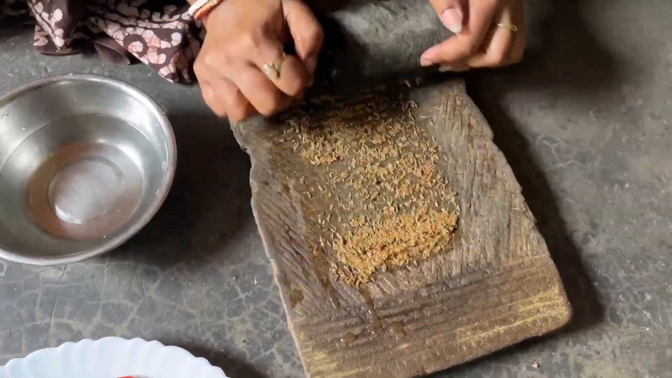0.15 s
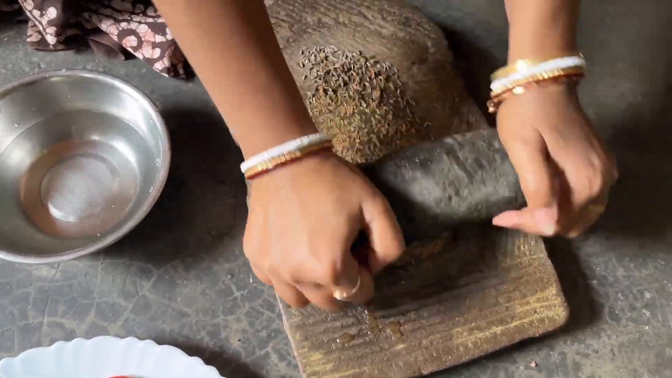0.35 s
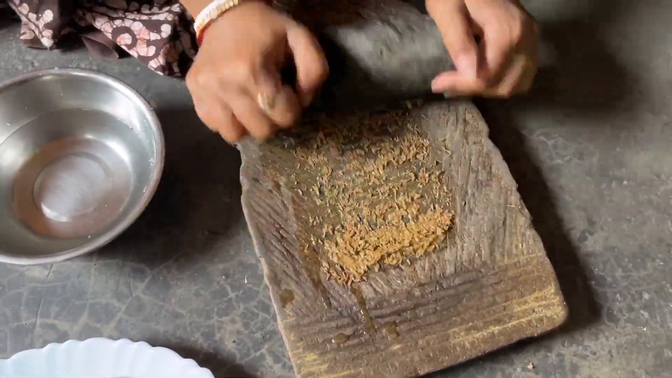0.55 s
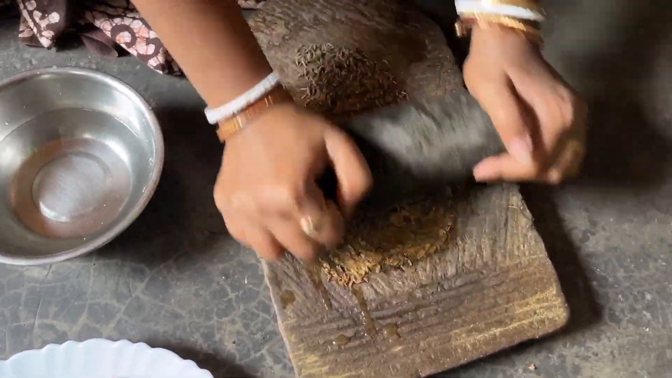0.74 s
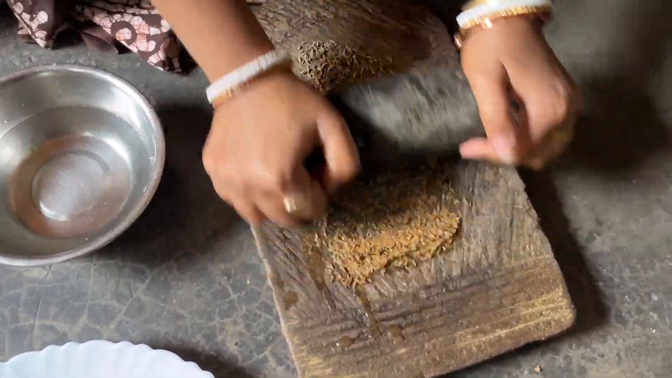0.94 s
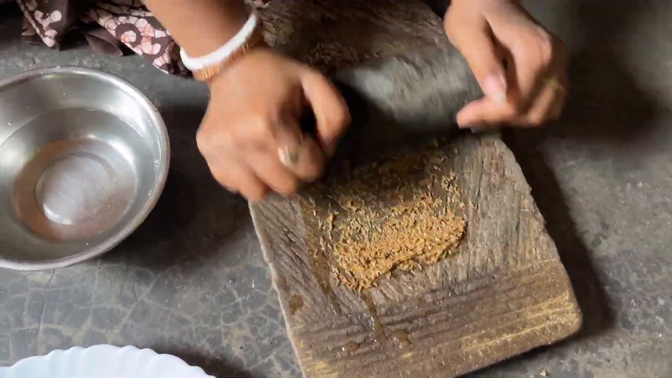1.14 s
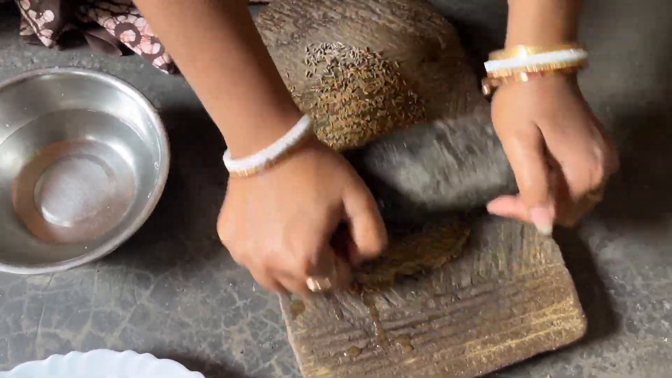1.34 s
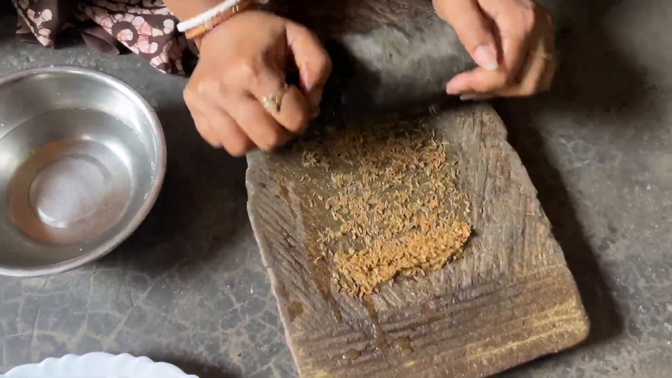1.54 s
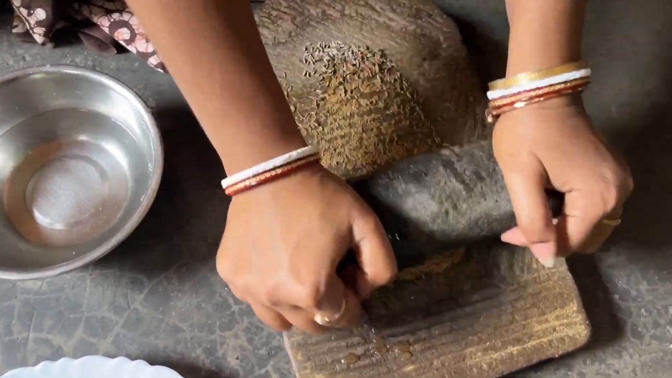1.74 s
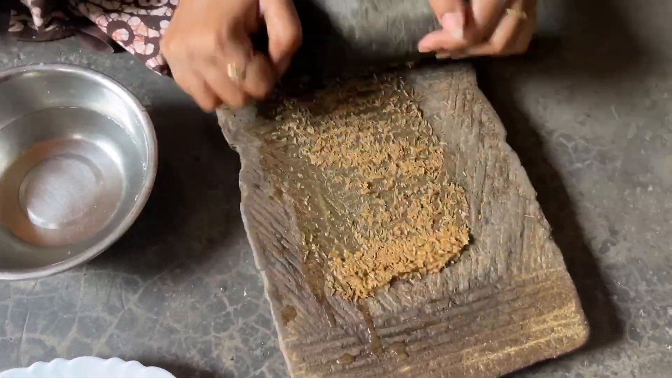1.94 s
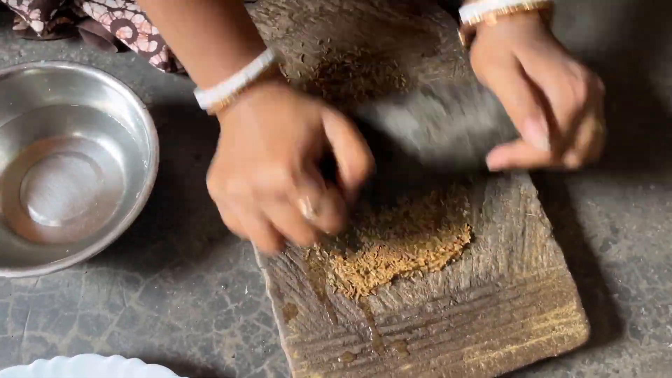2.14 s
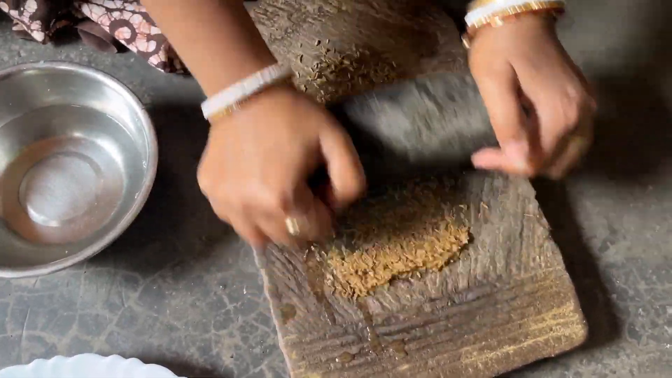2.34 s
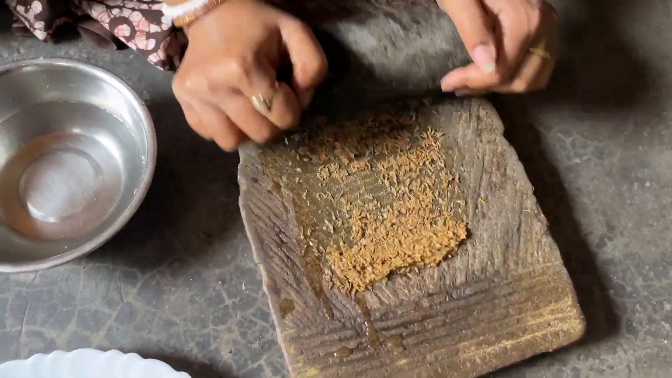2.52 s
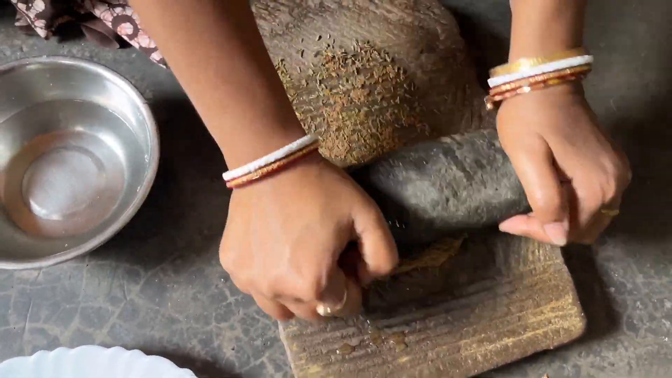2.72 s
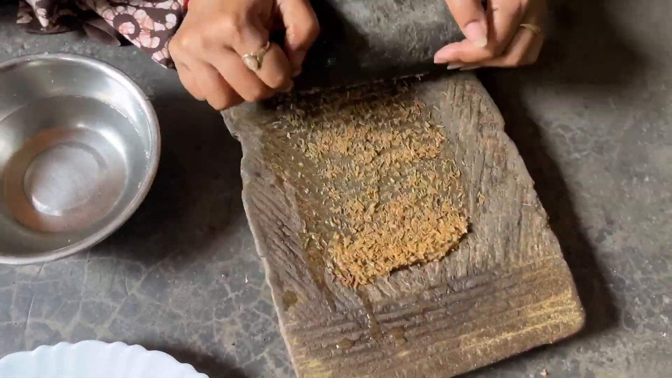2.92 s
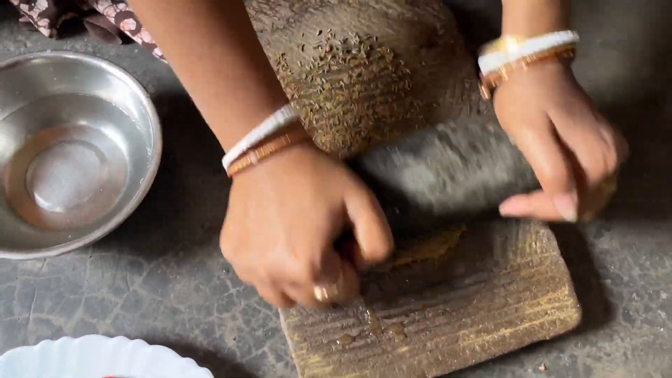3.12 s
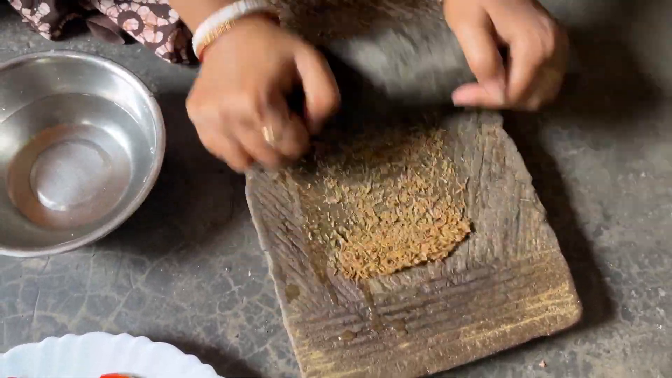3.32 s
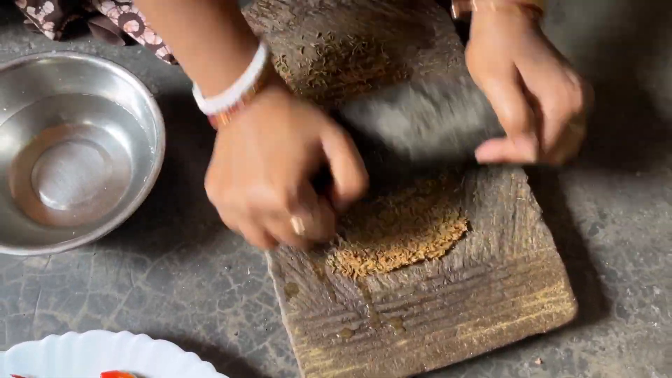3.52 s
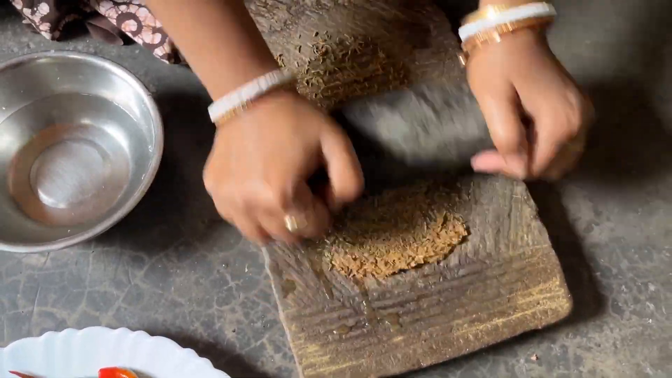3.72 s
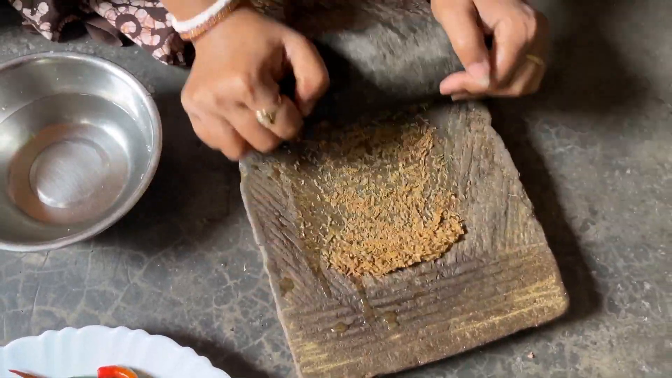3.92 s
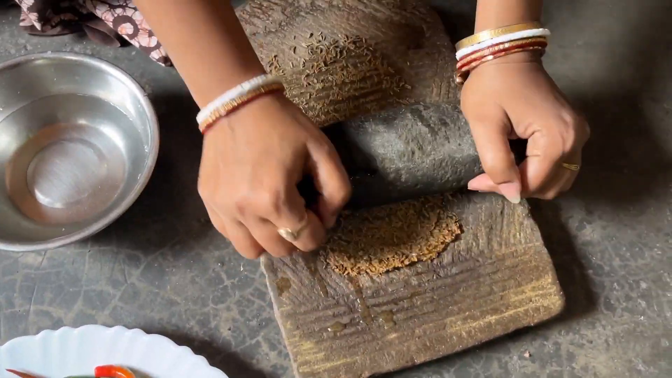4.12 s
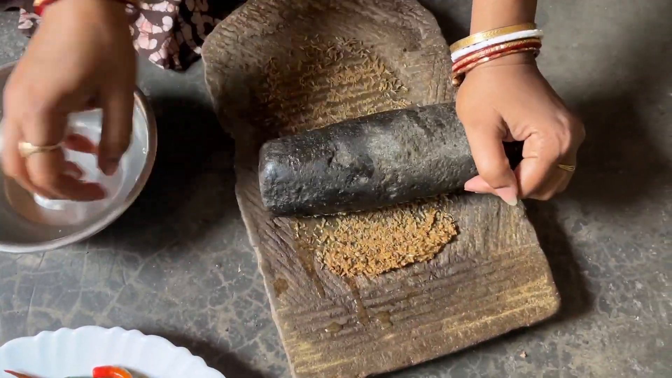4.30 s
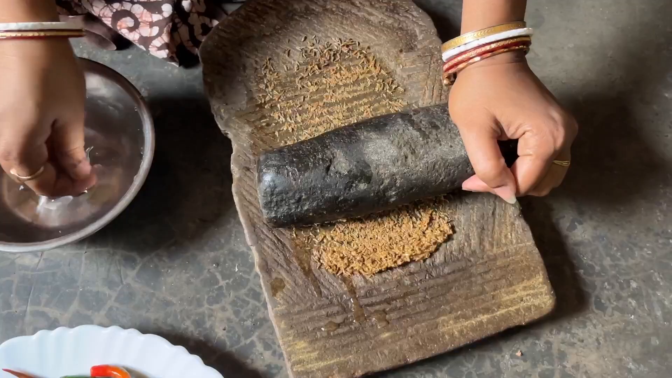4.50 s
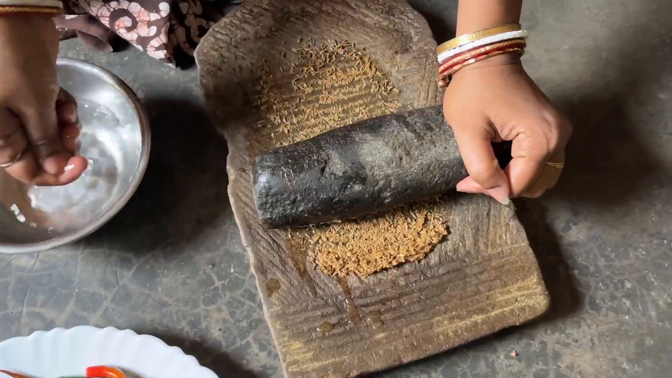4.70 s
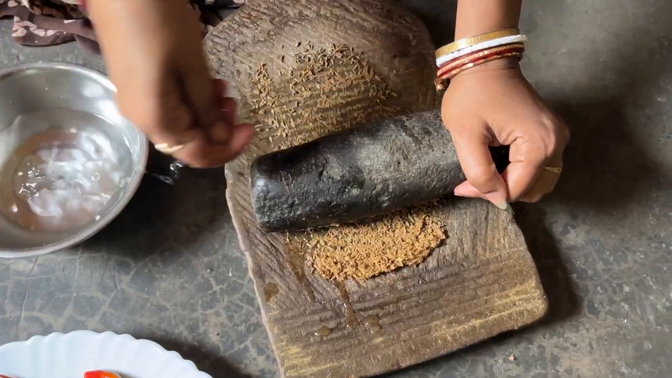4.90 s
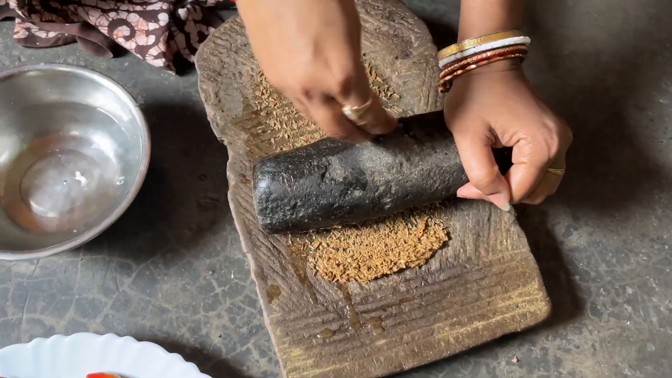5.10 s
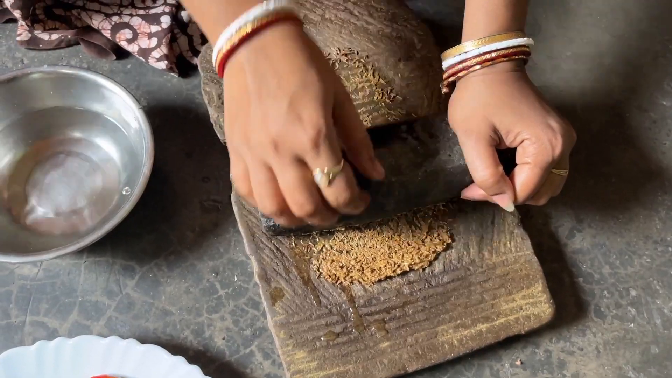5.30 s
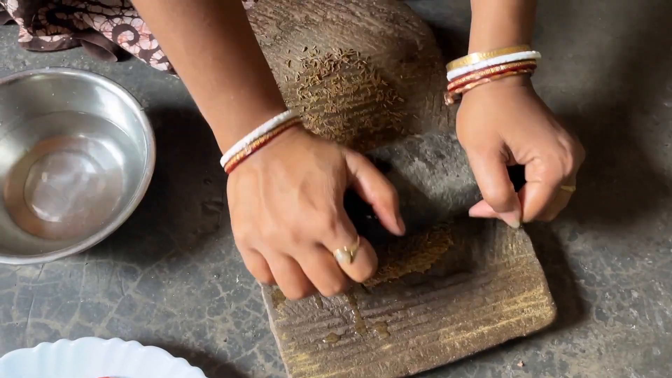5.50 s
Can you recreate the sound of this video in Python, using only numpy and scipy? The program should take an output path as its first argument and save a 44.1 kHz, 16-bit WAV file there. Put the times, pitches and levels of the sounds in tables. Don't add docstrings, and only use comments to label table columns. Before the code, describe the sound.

Stone grinds on stone in brisk strokes, roughly two full cycles each second: clattering ringing jolts, coarse scraping, crunching seeds and a heavy floor rumble. Thin metal bangles tick at stroke turns. The grinding halts just after four seconds, leaving soft sizzling from a pan further off, a low kitchen hum and quiet watery plips. A faint stone touch returns at the end. Close stereo pickup, short dull room tail.

```python
import sys
import numpy as np
from scipy import signal
from scipy.fft import rfft, irfft
from scipy.io import wavfile

SR = 44100
rng = np.random.default_rng(int(sys.argv[2]) if len(sys.argv) > 2 else 0)


def digitize_waveform(pressure):
    field = np.atleast_2d(pressure).T
    bounded = np.clip(field, -1, 1)
    quanta = np.round(bounded * 32767).astype(np.int16)
    wavfile.write(sys.argv[1], SR, quanta)


def gain_from_db(level_db):
    decades = np.asarray(level_db, float) / 20
    return 10 ** decades


N = 244755


def stroke():
    # turn t/s, weight level/dB, lift at the turn/dB, rasp above weight/dB
    passes = [(-.1, -37.5, -5, 7), (.15, -31.5, -14.5, -5), (.38, -34, -7, 0.5), (.55, -32, -2.5, -4),
              (.83, -33, -10, -4), (1.09, -34.5, -2.5, -1.5), (1.3, -32, -7.5, -4), (1.56, -32, -2.5, -4),
              (1.75, -34.5, -7.5, 1.5), (2.05, -32.5, -7, -0.5), (2.241, -32, -13.5, -2.5),
              (2.5, -33.5, 2, -7.5), (2.73, -30, -14, -8), (2.98, -34, -3, -2), (3.2, -32, -12.5, -5.5),
              (3.44, -32.5, -2, -5.5), (3.65, -32, -12, -4.5), (3.91, -39.5, 3.5, -2)]
    # t/s, level/dB, length/s
    skids = [
        (0.0, -32, 0.18),
        (0.64, -47, 0.13),
        (1.63, -44, 0.085),
        (1.915, -33, 0.024),
        (2.085, -35.5, 0.035),
        (2.2, -35, 0.022),
        (4.107, -52, 0.079),
    ]
    rise_s, fall_s, sag_db = 0.092, 0.05, -3
    set_down_s, die_s, restart_s, restart_db = 4.11, 0.084, 5.44, -46
    mean_db, slab_follows, muller_follows = -31, 1.38, 0.54

    ends = [p[0] for p in passes[1:]] + [set_down_s]
    rows = []
    for (s, db, lift_db, rasp_db), end in zip(passes, ends):
        rows += [(s, db + lift_db, rasp_db), (s + rise_s, db, rasp_db)]
        rows += [(max(end - fall_s, s + rise_s), db + sag_db, rasp_db)]
    rows += [(set_down_s, -49, 1.5), (set_down_s + die_s, -64, 3), (set_down_s + 2 * die_s, -90, 0)]
    rows += [(restart_s - .04, -90, 0), (restart_s, restart_db - 10, -4), (N / SR, restart_db, -4)]
    weight_db, rasp_db = in_time(rows)
    above_mean_db = weight_db - mean_db
    slab_db = mean_db + slab_follows * above_mean_db + rasp_db
    muller = gain_from_db(-46 + muller_follows * above_mean_db) + swells(skids)
    return weight_db, slab_db, 20 * np.log10(muller)


def jolts():
    # t/s, slab level/dB, muller ring and edge ring above slab/dB
    knocks = [(0.088, -13.5, -5.5, -18), (0.402, -11.5, -7, -1), (0.467, -11, -6.5, -3.4),
              (0.507, -13, -7, -1), (0.858, -18, -14, -3), (0.9182, -12, -10, -4), (0.9546, -15.5, -11, -2),
              (1.1657, -16.5, -14, -3), (1.3108, -16, -12, -8), (1.3716, -12, -10, -5.5),
              (1.408, -15, -10, -7), (1.618, -16.5, -23, -4.5), (1.8046, -18, -17, -12),
              (1.8388, -21, -14.1, -14.4), (2.273, -12.5, -17, -0.5), (2.332, -8, -10, -4),
              (2.3703, -13, -10, -1), (2.7993, -13, -11, -6.5), (2.834, -12, -12, -2.5),
              (3.2732, -15, -16, -5.5), (3.3052, -18.5, -12, -4), (3.6822, -17, -12, -4),
              (3.738, -10.5, -12, -2), (3.7723, -13.5, -11, -1.5)]
    # t/s, slab level/dB, muller and edge ring above slab/dB
    glances = [(.0115, -32, 6, -10), (0.022, -38, 8, -8), (0.025, -23, 10, -6), (.245, -32, 6, -1),
               (.322, -27, -4, 12), (.426, -33, 2, -5), (.493, -34, 4, 3), (0.679, -24, -5, -12),
               (.712, -36, -3, 12), (0.808, -36, 3, -8), (0.925, -36, 6, -5), (2.066, -40, 9, -8),
               (2.09, -31, -6, -6), (2.009, -35, -5, 14), (3.201, -40, -2, 17), (3.21, -42, -4, 11),
               (3.054, -37, 1, 0), (3.256, -37, -2, 11)]
    # t/s, slab level/dB, muller ring and edge ring above slab/dB, slab f/Hz
    chatter = [(0.191, -31, -20.9, -11.5, 840), (0.5911, -6.5, -28, -11, 910), (0.6242, -5, -23, -14, 960),
               (1.0126, -19.5, -21, -17, 900), (1.4653, -14.5, -19, -20, 900), (1.4724, -17, -12, -20, 930),
               (1.4862, -10.5, -32.9, -27, 940), (1.5048, -16, -23, -25.7, 980),
               (1.5213, -20.5, -24, -21, 1000), (1.9509, -18, -5, -11, 900), (2, -24, -26.2, -16, 970),
               (2.036, -30, -18.8, -6, 970), (2.0468, -24, -24.8, -15.4, 1000),
               (2.0644, -17.5, -22, -15.0, 880), (2.4551, -5.5, -21, -7, 910),
               (2.4688, -10.5, -3, -20, 930), (2.4796, -8, -24, -8, 980), (2.5028, -12, -25, -10, 980),
               (2.8918, -14, -20, -19, 930), (2.913, -10.5, -29.0, -15, 950), (2.929, -16, -26.0, -12, 930),
               (2.9353, -26, -6, -14.7, 1000), (2.945, -19, -26.1, -15, 1000), (3.358, -11, -16, -14, 900),
               (3.38, -11.5, -28.2, -18, 970), (3.3977, -20, -21.1, -19, 1030),
               (3.4107, -24, -20.1, -19.6, 1000), (3.8511, -8.5, -32, -8, 1000),
               (3.8734, -14.5, -12, -19, 960)]
    # t/s, muller level/dB, edge ring above it/dB
    blows = [(.002, -13, -7), (0.0137, -28, -29), (0.0296, -10, -2), (0.0381, -9.5, 0), (0.3122, -15.5, 0),
             (1.852, -12, 2), (1.8988, -6.5, -0.5), (2.1708, -23, 1), (4.07, -18.5, -1),
             (1.8562, -14.5, -20), (1.8951, -27, 16), (1.666, -31.5, 14), (2.22, -24, -20)]
    # t/s, slab level/dB, slab f/Hz
    sings = [
        (2.0035, -24, 1000),
        (2.0105, -24, 1040),
        (2.017, -25, 1050),
        (2.0385, -26, 1000),
        (2.073, -24.5, 900),
        (1.5255, -30, 1040),
        (1.5325, -23, 1000),
    ]
    # t/s, slab level/dB
    rocks = [(.4193, -16.5), (.487, -18), (.801, -28), (1.1529, -22), (1.2517, -24), (1.605, -25.5),
             (1.693, -16), (1.9339, -21), (2.2868, -16), (2.354, -17), (2.7397, -22.5), (2.8158, -18.5),
             (3.1396, -17.5), (3.4903, -20), (3.5894, -19), (3.7579, -15.5), (5.461, -35)]
    # t/s, slab level/dB
    rattles = [(.5739, -9), (.6046, -10.5), (1.493, -26), (1.5112, -40), (2.022, -28), (2.4392, -9),
               (2.4868, -14.5), (2.897, -19.5), (2.9222, -26), (3.3673, -17), (3.3895, -21), (3.8394, -15),
               (3.8601, -15)]
    # t/s, slab level/dB
    drags = [(.26, -22.5), (.7061, -23.5), (1.1348, -20.5), (1.5839, -23), (1.666, -32), (2.1163, -20.5),
             (2.5571, -22.5), (2.5828, -20), (3.0224, -26), (3.0445, -23), (3.4728, -19), (3.5015, -21),
             (1.761, -28.5), (2.108, -26), (2.131, -33), (2.545, -41), (3.22, -30), (3.693, -27),
             (3.94, -31.5)]
    # t/s, slab level/dB
    settles = [
        (1.7058, -16.5),
        (2.2146, -22.5),
        (2.6891, -23),
        (3.1519, -20.5),
        (3.5999, -21.5),
    ]
    # t/s, slab level/dB
    leads = [
        (.56, -7),
        (1.9405, -8.5),
        (2.4266, -6.5),
        (3.8276, -7),
    ]
    # t/s, slab level/dB
    touches = [(.176, -29), (3.466, -26), (3.538, -34), (.205, -29), (.8665, -21), (3.066, -33),
               (3.288, -28), (.645, -24), (.9365, -26), (1.028, -25), (1.101, -34), (1.39, -26),
               (1.263, -25), (1.772, -30), (1.826, -29), (2.497, -22), (2.522, -32), (2.681, -27),
               (2.853, -25), (2.982, -29), (3.4025, -26), (3.444, -31), (2.591, -26)]
    # muller ring, edge ring and thud above slab/dB, slab f/Hz
    kinds = [(rocks, (-6.5, -16, -1, 811)), (rattles, (-3.5, -7, -6.5, 1008)), (drags, (-7, -4, 0, 962)),
             (settles, (-3, -24, -2, 750)), (leads, (-14, -5, -21, 940)), (touches, (-11, -9, -8.5, 898))]
    knock_thud_db, knock_hz = -6.5, 930
    chatter_thud_db, chatter_pitch = -16, 1.05
    blow_slab_db, blow_thud_db, blow_hz = -4.5, -6, 1000

    rows = [(*knock, knock_thud_db, knock_hz) for knock in knocks + glances]
    for table, kind in kinds:
        rows += [(s, db, *kind) for s, db in table]
    rows += [(*beat, chatter_thud_db, chatter_pitch * hz) for *beat, hz in chatter]
    for s, db, edge_db in blows:
        above_slab_db = (-blow_slab_db, edge_db - blow_slab_db, blow_thud_db - blow_slab_db)
        rows.append((s, db + blow_slab_db, *above_slab_db, blow_hz))
    rows += [(s, db, -20, -17, -25, hz) for s, db, hz in sings]
    return np.array(rows)


def bounces(rows):
    bounce_s, bounce_db, bright_db = .005, -17, 1
    late, loose, spot = rng.uniform(-1.16, 1, (len(rows), 3)).T
    again = rows + [bounce_s, bounce_db, bright_db, bright_db, 3.0, 0]
    again[:, 0] += 0.297 * bounce_s * late
    again[:, 1] += 2.5 * loose
    again[:, 5] *= 1 + 0.22 * spot
    return again


def ring(hz, t60, rise_s, left_db=0.):
    choke_s = 0.0024
    t = np.arange(min(int(t60 * SR), 2500)) / SR
    left = min(gain_from_db(left_db), 1)
    after = np.maximum(t - rise_s, 0)
    choke = left + (1 - left) * np.exp(-(after / choke_s) ** 2)
    swell = np.sin(np.pi / 2 * np.minimum(t / rise_s, 1)) ** 2
    decay = gain_from_db(-60 * after / t60)
    return swell * decay * choke * np.cos(2 * np.pi * hz * (t - rise_s))


def stones(slab_db, muller_db):
    # f/Hz, level/dB, time to fall 60 dB/s, left over right/dB
    tones = [
        (271.5, -9, 0.036, -3),
        (499, -1.5, 0.02, 3),
        (883.6, -1, 0.031, 4.5),
        (970, -9, 0.014, 10.5),
        (1392, -3.5, 0.056, -5),
        (1428, -11.5, 0.016, 20),
        (2235, -9, 0.0089, -1),
        (3320, -4.5, 0.032, 2),
        (1765, -3.5, 0.015, 6),
    ]
    excited_by = [3, 3, 0, 0, 1, 1, 4, 5, 2]
    facing = [1, 1, 1, 1, -1, -1, 1, 1, 1]
    left_ringing_db = [-11, 2.5, -2.5, -7, 11, 0]
    # t/s, level/dB, length/s
    slides = [
        (.19, -37, 0.092),
        (.65, -38, 0.11),
        (1.5, -34, 0.079),
        (2.03, -34, 0.069),
        (2.52, -40, 0.12),
        (2.92, -43, 0.21),
        (3.39, -31, 0.046),
    ]
    # t/s, level/dB, length/s
    rubs = [
        (3.96, -28, 0.046),
        (4.02, -31, 0.041),
    ]
    slab_hz, crest_s = 940, 0.002
    slow_lows = 0.41
    detune = .012

    rows = jolts()
    luck = rng.standard_normal((len(rows), 2, len(tones)))
    rows = np.vstack([rows, bounces(rows)])
    at = np.maximum(((rows[:, 0] - crest_s) * SR).astype(int), 0)
    part_db = rows[:, 1:2] + rows[:, 1:5] * [0, 1, 1, 1]
    hard_edge_db = 1.06 * part_db[:, 2] - 5
    hard_muller_db = 2 * part_db[:, 1] - 0.5
    strength_db = np.column_stack([part_db, hard_edge_db, hard_muller_db])
    chance, spot = np.vstack([luck, luck[::-1]]).transpose(1, 0, 2)
    shifts = rows[:, 5] / slab_hz

    scratch = rms_one(grains(800, spread_db=2.0))
    slide_db = 20 * np.log10(gain_from_db(slab_db) + swells(slides))
    rub_db = 20 * np.log10(gain_from_db(slab_db) + swells(rubs))
    out = np.zeros((2, N))
    for k, (hz, level_db, t60, lean_db) in enumerate(tones):
        part = excited_by[k]
        thud_db = rub_db if hz < 400 else slab_db
        rasp_db = [slide_db - 23.5, muller_db - 19.0, slab_db - 22.5, thud_db - 23.5, -99, -99][part]
        rasp = gain_from_db(rasp_db + 5.5) * scratch * rng.choice([-1, 1], N)
        damped = ring(hz, 0.39 * t60, rise_s=0.0024)
        rung = np.pad(signal.oaconvolve(rasp, damped)[:N], (0, 2500))
        follows = [1, .25, .1, 0, 0, 0][part]
        rise_s = crest_s * (slab_hz / hz) ** slow_lows
        pitches = hz * (1 + detune * spot[:, part]) * shifts ** follows
        hits_db = strength_db[:, part] + 1.4 * chance[:, k]
        for i, pitch, db in zip(at, pitches, hits_db):
            hit = ring(pitch, t60, rise_s=rise_s, left_db=left_ringing_db[part])
            rung[i:i + len(hit)] -= facing[k] * gain_from_db(db) * hit
        out += rung[:N] * gain_from_db(level_db + np.array([[lean_db / 2], [-lean_db / 2]]))
    return out


def rumble(rumble_db):
    # f/Hz, level per Hz/dB
    roll_tone = [(38, -34), (60, -1.5), (90, -1), (150, -3), (230, -6), (330, -11.5), (600, -19),
                 (1200, -29)]
    # f/Hz, width/Hz, level/dB
    floor = [
        (84, 39, 1),
        (135.4, 10.5, 5),
        (223.5, 29, 5),
    ]
    lumps = gain_from_db(rumble_db + 1.14 * drift(29.01) + 0.76 * drift(11.0))
    roll = colour(grains(3000, spread_db=4.0), roll_tone)
    lift_db = resonances(np.fft.rfftfreq(N, 1 / SR), floor)
    return lumps * rms_one(irfft(rfft(roll) * gain_from_db(lift_db), N))


def grit(rumble_db):
    # f/Hz, level per Hz/dB
    crack_tone = [(2000, -37), (5000, 5), (8000, -2.5), (11000, 3.5), (14000, -12), (16000, -35.5)]
    return gain_from_db(rumble_db - 17.5) * colour(grains(5000, spread_db=7.5), crack_tone)


def bangles():
    # t/s, peak level/dB, f/Hz, chatter length/s
    clinks = [(.2244, -30, 13900, .006), (0.3156, -21.5, 14100, 0.0062), (.3235, -21, 10500, .002),
              (.6575, -31, 13400, .002), (.6655, -34, 13400, .002), (.693, -29, 11700, 0.0018),
              (.7455, -30, 11600, .001), (.7868, -26, 13000, .001), (.7936, -22, 10500, 0.0045),
              (.798, -28, 13200, 0.0026), (0.801, -25, 11000, 0.0041), (1.121, -27.5, 11000, .003),
              (1.2234, -31, 12900, .004), (1.241, -27, 12000, .005), (1.259, -27, 12900, 0.0035),
              (1.6865, -30, 13300, .003), (1.6916, -28, 13000, .003), (1.7052, -24.5, 13300, 0.004),
              (2.138, -31, 13200, 0.0018), (2.1674, -30, 13600, 0.0065), (2.1786, -25, 13400, .006),
              (2.195, -28, 13300, .004), (2.6446, -27, 13700, .006), (2.6588, -28, 13600, .005),
              (2.67, -31, 13500, .005), (2.681, -30, 11700, .004), (3.1205, -27.5, 14100, .002),
              (3.123, -37, 13900, .011), (3.137, -32, 13900, 0.0065), (3.149, -21, 12700, .001),
              (3.1535, -32, 14500, .003), (3.6012, -28, 12800, .002), (3.605, -22, 13200, .004),
              (4.024, -28, 14000, .005), (4.0389, -28, 14100, 0.0042), (4.0584, -30, 13300, .004)]
    out, t = np.zeros(N), np.arange(900) / SR
    damping = np.exp(-np.pi * 900 / SR)
    for s, peak_db, hz, hold_s in clinks:
        tick = gain_from_db(-60 * t / 0.0027)
        chatter = gain_from_db(1.5 - 60 * np.maximum(t - hold_s, 0) / 0.024)
        touch = rng.standard_normal(900) * (tick + chatter)
        resonance = [1, -2 * damping * np.cos(2 * np.pi * hz / SR), damping ** 2]
        rung = signal.lfilter([1 - damping], resonance, touch)
        snap = gain_from_db(-12) * np.diff(touch, 2, prepend=[0, 0])
        i = round(s * SR)
        out[i:i + 900] += gain_from_db(peak_db - 3.5) * (rung + snap) / np.abs(rung).max()
    return np.array([out, .78 * out + .22 * np.roll(out, 1)])


def drips():
    # t/s, level/dB, length/s, f/Hz
    trickles = [
        (4.507, -46, 0.045, 1760),
        (4.714, -41, 0.11, 2740),
        (4.907, -38.5, 0.087, 2880),
        (4.978, -43.5, 0.074, 1530),
        (5.18, -41, 0.07, 2830),
        (5.207, -45, 0.065, 2560),
        (5.28, -42, .1, 4100),
        (4.824, -42.5, 0.089, 1740),
        (5.17, -47, 0.055, 1700),
    ]
    width = .07
    swarm = grains(3000, spread_db=4.0)
    out = np.zeros(N)
    for s, db, length, hz in trickles:
        band = signal.butter(1, [hz * (1 - width), hz * (1 + width)], "band", fs=SR, output="sos")
        out += swells([(s, db, length)]) * rms_one(signal.sosfilt(band, swarm))
    return out


def echo(x):
    t60, echo_db = 0.1, -23
    t = np.arange(8000) / SR
    tails = rng.standard_normal((4, 2, 8000)) * gain_from_db(-60 * t / t60) * (t > .003)
    tails = signal.sosfilt(signal.butter(2, [350, 3000], "band", fs=SR, output="sos"), tails)
    spots = gain_from_db([12 * drift(25) for _ in tails])
    spots /= np.linalg.norm(spots, axis=0)
    out = np.zeros((2, N))
    for spot, tail in zip(spots, tails):
        out += signal.oaconvolve(x[None] * spot, tail / np.linalg.norm(tail[0]), axes=1)[:, :N]
    return gain_from_db(echo_db) * out


def pan():
    # t/s, sizzle level/dB
    heat = [
        (0.0, -36.5),
        (2.47, -35.5),
        (2.72, -36.5),
        (5.55, -36.5),
    ]
    # f/Hz, level per Hz/dB
    sizzle_tone = [(240, -17.5), (560, -17), (630, -4), (720, -14), (1300, -7), (2300, 0), (3900, 0),
                   (5200, -3.5), (7000, -8.5), (10000, -11), (13000, -15.5), (16000, -19)]
    return gain_from_db(in_time(heat)[0] + 3.5) * far_noise(sizzle_tone, patchy_db=1.5, count=15)


def drone():
    # f/Hz, level per Hz/dB
    hum_tone = [(30, -28), (58, -6.5), (120, -8), (160, 0), (190, -11), (240, -40)]
    return gain_from_db(-52.5) * far_noise(hum_tone + [(400, -60)], patchy_db=-0.5, count=1)


def far_noise(spectrum, patchy_db, count):
    # f/Hz, left-right likeness/0 to 1, left over right/dB
    likeness = [(60, .99, -0.5), (300, 0.74, 0.5), (900, 0.22, 0.5), (1600, 0.026, 5), (2660, 0.33, 0.5),
                (3500, 0.018, 0), (4820, 0.43, 6), (6390, 0.033, -1), (6300, 1, -6.5), (7500, 0.86, 0.5)]
    # f/Hz, width/Hz, left level/dB, right level/dB
    standing_waves = [(1594, 180, -19.5, 10), (1730, 34, 17, -31), (2020, 33, -20, -20),
                      (3185, 45, -7, -19), (3880, 240, 4, -2), (4500, 130, -1, 8.5), (2810, 30, 4.5, 4),
                      (3530, 42, 4, 1.5), (5180, 170, 3, 3.5)]
    white = rfft(rng.standard_normal((2, N)))
    hz = np.maximum(np.fft.rfftfreq(N, 1 / SR), 1)
    alike = np.clip(at_hz(likeness, hz), 0, 1)
    lean = gain_from_db(at_hz(likeness, hz, order=2) / 2)
    right = alike * white[0] + np.sqrt(1 - alike ** 2) * white[1]
    waves_db = resonances(hz, standing_waves)
    pair = np.array([white[0] * lean, right / lean]) * gain_from_db(at_hz(spectrum, hz) + waves_db)
    band = np.round(4 * np.log2(np.clip(hz, 700, 7500) / 700))
    together = drift(8.0)
    out = np.zeros((2, N))
    for k in range(count):
        flicker = gain_from_db(patchy_db * (0.31 * together + drift(16.0)))
        out += irfft(pair * (band == k), N) * flicker
    return rms_one(out)


def rms_one(x):
    return x / np.sqrt(np.mean(x ** 2) + 1e-20)


def in_time(rows):
    s, *columns = np.transpose(rows)
    return [np.interp(np.arange(N) / SR, s, c) for c in columns]


def swells(rows):
    t = np.arange(N) / SR
    return sum(gain_from_db(db) * np.exp(-(2 * (t - s) / length) ** 2) for s, db, length in rows)


def at_hz(points, hz, order=1):
    points = np.array(points)
    return np.interp(np.log(hz), np.log(points[:, 0]), points[:, order])


def resonances(hz, rows):
    return sum(np.outer(db, 1 / (1 + (2 * (hz - f) / width) ** 2)) for f, width, *db in rows).squeeze()


def drift(rate):
    knots = rng.standard_normal(400)
    return np.interp(np.arange(N) * rate / SR, np.arange(400), knots)


def grains(per_s, spread_db):
    sizes = gain_from_db(spread_db * np.minimum(rng.exponential(1, N), 4)) * rng.choice([-1, 1], N)
    return sizes * (rng.random(N) < per_s / SR)


def colour(x, spectrum):
    hz = np.maximum(np.fft.rfftfreq(N, 1 / SR), 1)
    return rms_one(irfft(rfft(x) * gain_from_db(at_hz(spectrum, hz)), N))


def scene():
    rumble_db, slab_db, muller_db = stroke()
    near = stones(slab_db, muller_db) + rumble(rumble_db) + grit(rumble_db)
    near = near + bangles() + drips()
    return near + echo(near.mean(axis=0)) + pan() + drone()


def low_pass(x):
    return signal.sosfilt(signal.butter(12, 16600, fs=SR, output="sos"), x)


def record(dry):
    # f/Hz, lead/half turns
    right_lead = [(0, 0), (800, -.25), (1400, -.3), (2100, 0), (5200, -.25), (6800, .45), (8600, 1),
                  (15300, 2.97), (22050, 3.3)]
    hz, turns = np.transpose(right_lead)
    lead = np.exp(1j * np.pi * np.interp(np.fft.rfftfreq(N, 1 / SR), hz, turns))
    ports = np.array([dry[0], irfft(rfft(dry[1]) * lead, N)])
    ports = signal.sosfilt(signal.butter(2, 42, "high", fs=SR, output="sos"), ports)
    rounded = np.tanh(ports / 1.25) * 1.25
    mix = signal.sosfilt(signal.cheby2(16, 50, 16700, fs=SR, output="sos"), rounded)
    return low_pass(mix)


dry = scene()
out = record(dry)
digitize_waveform(out)
```